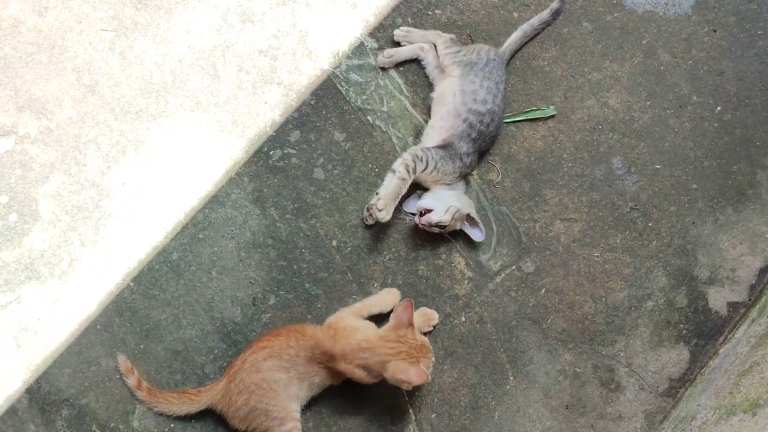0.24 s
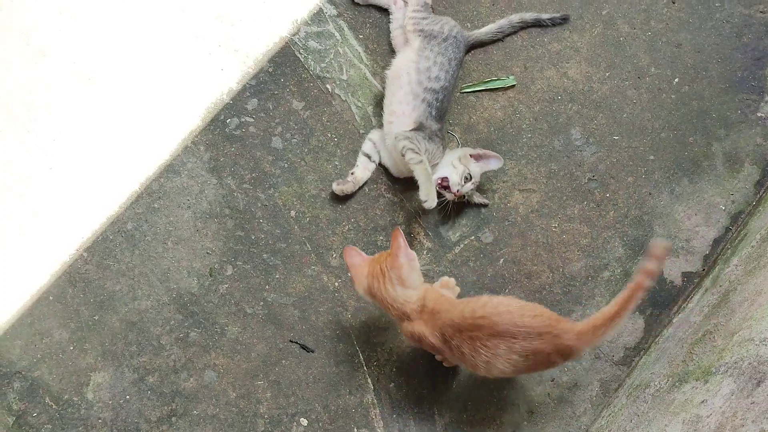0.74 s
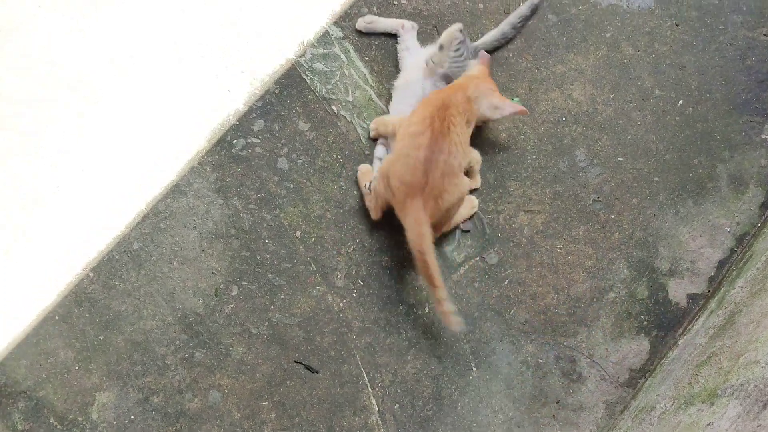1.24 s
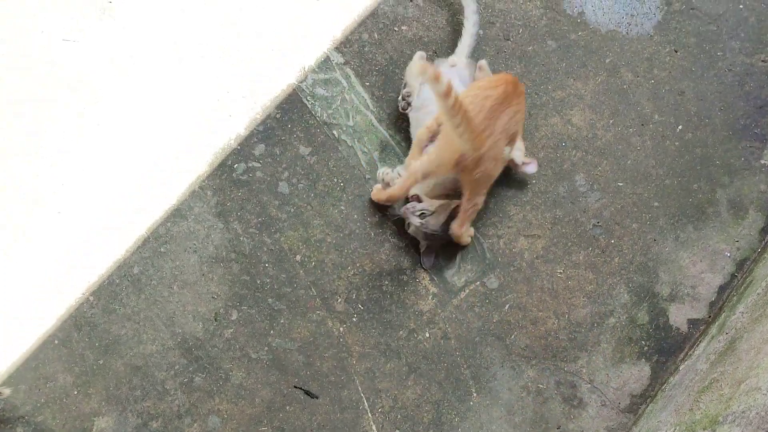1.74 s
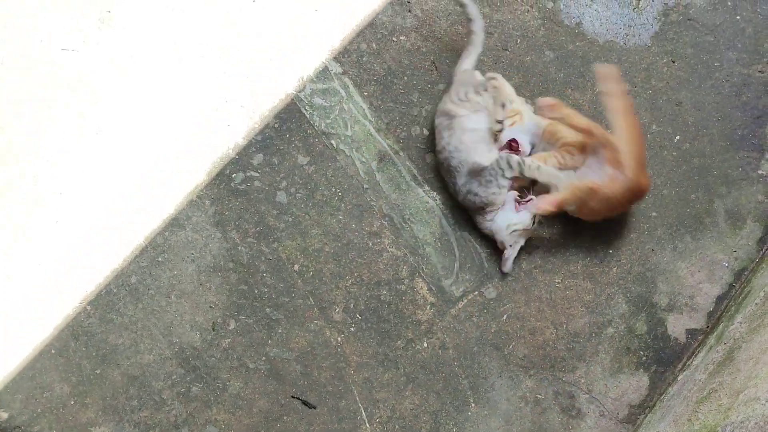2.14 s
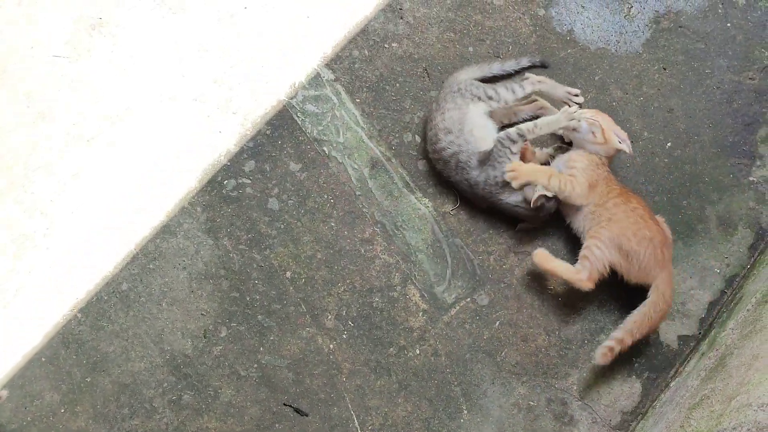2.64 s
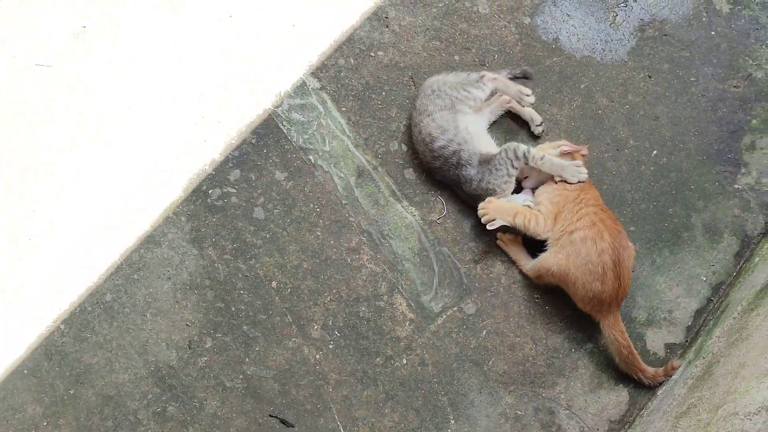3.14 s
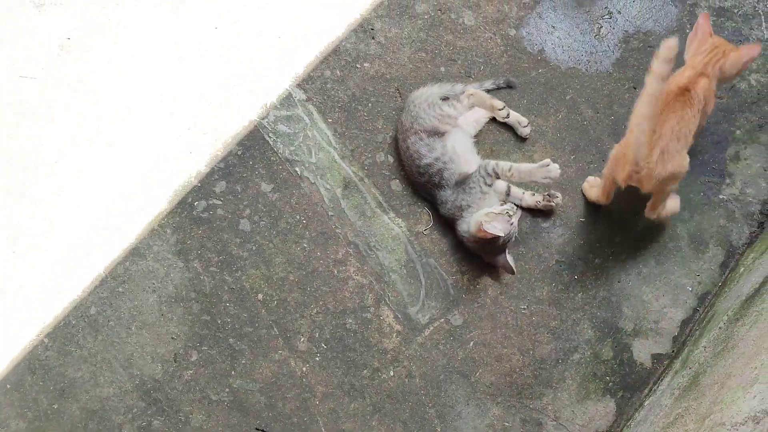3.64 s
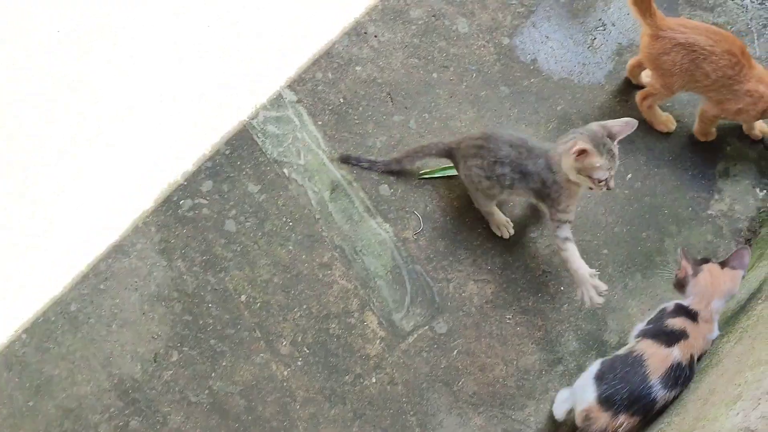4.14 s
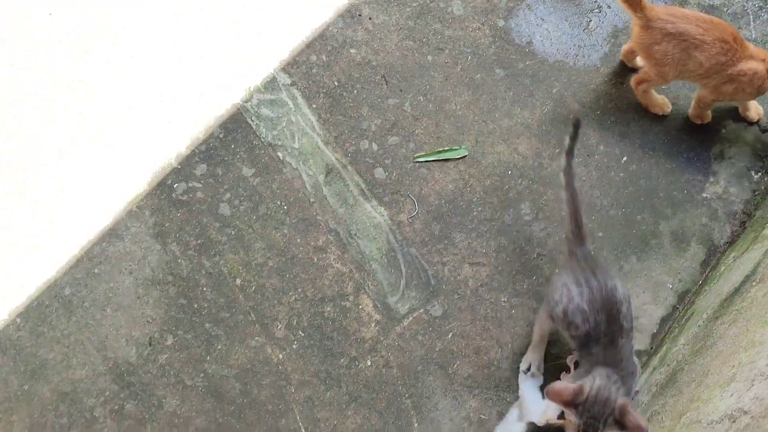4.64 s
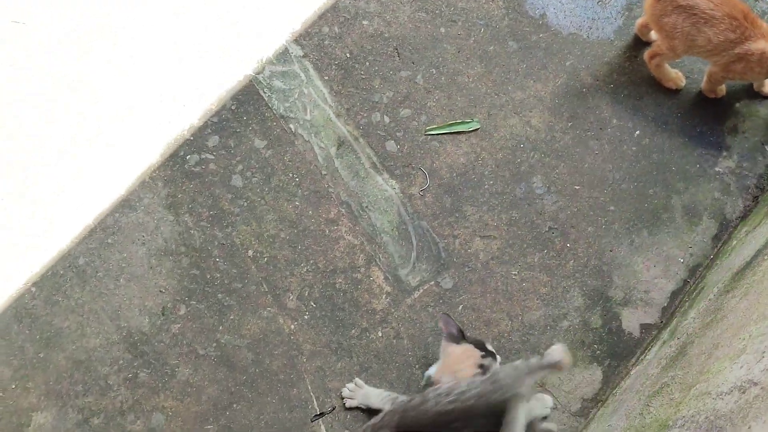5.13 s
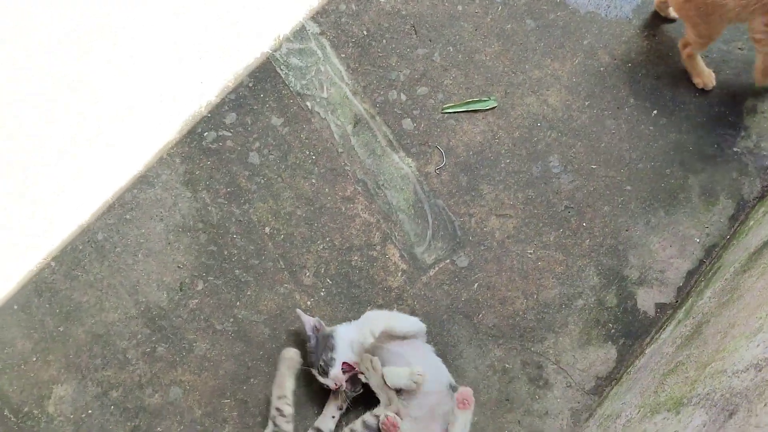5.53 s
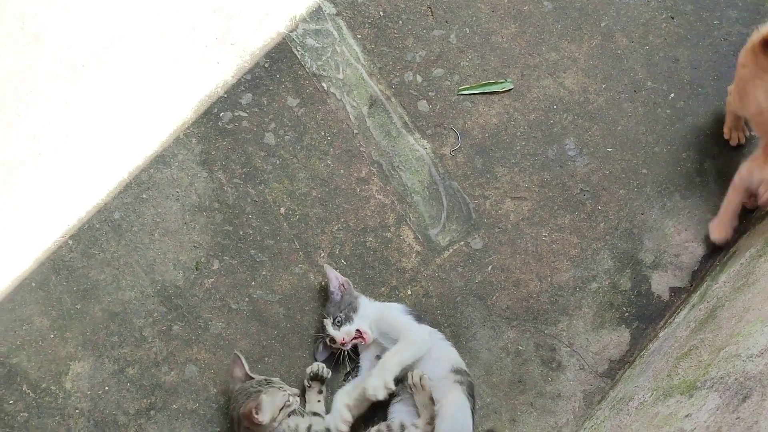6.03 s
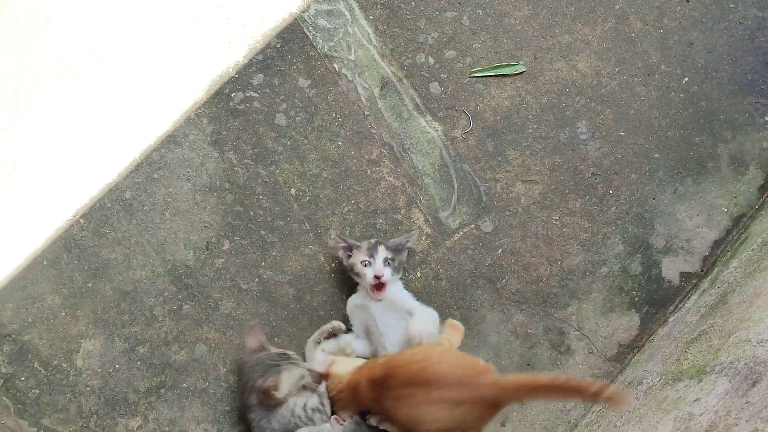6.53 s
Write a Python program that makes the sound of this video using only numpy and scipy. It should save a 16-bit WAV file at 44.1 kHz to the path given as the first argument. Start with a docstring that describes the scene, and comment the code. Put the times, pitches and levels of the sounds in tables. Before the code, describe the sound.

Outdoors in a concrete yard, small birds chip, whistle and trill at various distances, many blurred by short echoes. A close bird repeats rising slurred whistles early and midway. Light wind rumbles on a hand-held microphone with small bumps. Near the end the wind swells, a loud hard knock hits, sound cuts out for an instant, then the air returns slightly louder with a fly humming close. The playing kittens make no sound.

```python
"""A concrete yard: many small birds whistle, chirp and trill, straight and through its echoes.
Birds are near-sine whistles along pitch curves; the echoes are sparse random taps that die away.
Shaped noise makes the background and the light wind rumbling on a hand-held microphone.
A fly hums as wing-beat harmonics; finger knocks ring the housing and bumps push the membrane.
The sound drops out briefly near the end; the background returns a little louder, the fly close by."""
import sys
import numpy as np
from scipy import signal
from scipy.io import wavfile
from scipy.ndimage import uniform_filter1d

SR = 44100
rng = np.random.default_rng(int(sys.argv[2]) if len(sys.argv) > 2 else 0)


def waveform_to_disk(signal):
    """Save audio, clipped to [-1, 1], as 16-bit WAV at the path in sys.argv[1]."""
    frames = np.transpose(np.atleast_2d(signal))
    scaled = np.clip(frames, -1, 1) * 32767
    samples = np.round(scaled).astype(np.int16)
    wavfile.write(sys.argv[1], SR, samples)


N = 298998

# drop-out: fade_out_start_s, silent_from_s, silent_to_s, fade_in_end_s
DROPOUT_S = (6.293, 6.313, 6.374, 6.394)


def amp(db):
    """Amplitude factor of a level in dB."""
    return 10 ** (np.asarray(db) / 20)


def evened(x):
    """Scale to rms 1."""
    return x / np.sqrt(np.mean(x ** 2) + 1e-20)


def read(points, hz):
    """Interpolate a (hz, value) curve over log frequency."""
    f, value = np.transpose(points)
    return np.interp(np.log(hz + 1), np.log(f + 1), value)


def add(mix, start_s, sound, pan_db):
    """Mix in a mono sound; pan_db is left minus right."""
    part = mix[:, round(start_s * SR):][:, :len(sound)]
    gains = amp([[pan_db / 2], [-pan_db / 2]])
    part += sound[:part.shape[1]] * gains


def wander(count, smooth_s):
    """Smooth random curve of rms 1: white noise averaged twice."""
    width = max(round(smooth_s * SR), 1)
    once = uniform_filter1d(rng.standard_normal(count), width)
    return evened(uniform_filter1d(once, width))


def noise(spectrum, patchy_db, size):
    """Two partly alike channels of coloured noise with drifting patches, rms 1."""
    # left-right likeness: freq_hz, likeness_0_to_1
    likeness = [(30, 0.69), (600, 0.14), (3000, 0.39), (12000, 0.45)]
    hz = np.fft.rfftfreq(size, 1 / SR)
    frames = 4 * N // size + 5
    a, b, c, d, patches = rng.standard_normal((frames, len(hz), 5)).T
    patches = uniform_filter1d(patches, size=12, axis=0)
    patches = evened(uniform_filter1d(patches, size=10, axis=1))
    same = np.clip(read(likeness, hz), -1, 1)[:, None]
    left = a + 1j * b
    right = same * left + np.sqrt(1 - same ** 2) * (c + 1j * d)
    colour = amp(read(spectrum, hz)[:, None] + patchy_db * patches)
    z = np.array([left, right]) * colour
    return evened(signal.istft(z, nperseg=size, noverlap=3 * size // 4)[1][:, :N])


def air():
    """Distant town and leaves: steady shaped noise, a step louder after the drop-out."""
    # spectrum shape: freq_hz, relative_density_db (per Hz)
    air_shape = [(60, -9), (100, -2.5), (300, -6.5), (4600, -18.5), (8700, -27), (14100, -27), (15700, -34)]
    after = np.arange(N) / SR > DROPOUT_S[1]
    level_db = -46.5 + 2.9 * after
    return amp(level_db) * noise(air_shape, 1.2, size=1024)


def wind():
    """Wind on the microphone: lumpy low noise under a gust level curve."""
    # gust levels: time_s, level_db
    gust_levels = [(0, -41.5), (1.72, -36), (1.93, -37), (2.95, -40.5), (3.06, -33), (3.21, -39.5),
                   (4.9, -40.5), (5.36, -39.5), (5.631, -34), (6.04, -37), (6.1, -25.5), (6.3, -18),
                   (6.38, -33), (6.78, -42)]
    # spectrum shape: freq_hz, relative_density_db (per Hz)
    gust_shape = [(15, -8), (35, 0), (72, -8), (190, -30.5), (400, -67)]
    s, db = np.transpose(gust_levels)
    level_db = np.interp(np.arange(N) / SR, s, db) + [[1.5], [-1.5]]
    return noise(gust_shape, 2.8, size=4096) * amp(level_db)


def handling():
    """Taps ring the housing modes; bumps push the membrane in and let it swing back."""
    # taps: start_s, peak_level_db
    taps = [(6.084, -37), (6.1, -30), (6.222, -4.5), (6.288, -28.5)]
    # housing modes: freq_hz, relative_level_db, t60_s
    modes = [(970, 3, 0.012), (2020, 7, 0.0026), (3320, -11, 0.0049), (4700, -7, 0.0024)]
    # bumps: start_s, push_time_s, level_db
    bumps = [(1.729, 0.0086, -27), (1.747, 0.0022, -22.5), (2.627, 0.0046, -30), (6.273, 0.0024, -7)]
    out, t = np.zeros((2, N)), np.arange(3000) / SR
    ring = sum(amp(db - 60 * t / t60_s) * np.sin(2 * np.pi * hz * t) for hz, db, t60_s in modes)
    ring *= 1 - np.exp(-t / 0.0016)  # soft onset
    ring /= abs(ring).max()
    for start_s, db in taps:
        add(out, start_s, amp(db) * ring, pan_db=5.5)
    for start_s, push_s, db in bumps:
        u = t / push_s
        inward = u ** 2 * np.exp(2 - 2 * u)
        swing_back = 0.42 * (u / 2.9) ** 3 * np.exp(3 - 3 * u / 2.68)
        add(out, start_s, -amp(db) * (inward - swing_back), pan_db=5)
    return out


def fly():
    """One sharp pressure dip a wing beat; far off, the beat wavers and the second harmonic carries best."""
    # wing beat: time_s, beat_hz
    beat = [(0, 152), (3.6, 151.5), (6.3, 144.6), (6.39, 139.3), (6.435, 150.9), (6.59, 147.8),
            (6.63, 139.3), (6.676, 150.4), (6.72, 128.3), (6.748, 148), (6.78, 152)]
    # harmonics 1, 2, ..: relative_level_db
    wing_db = [-5.5, -7, -7, -25, -14, -14.5, -9.5, -18, -30, -32, -22]
    far_db, fade_db_per_s, near_db = -58, 0.8, -40.5
    t = np.arange(N) / SR
    far = t < DROPOUT_S[1]
    beat_hz = np.interp(t, *np.transpose(beat)) * (1 + 0.016 * far * wander(N, 0.03206))
    turns = np.cumsum(beat_hz) / SR
    wings = np.zeros(N)
    for k, db in enumerate(wing_db):
        colour_db = db + 6 * far * (k == 1) + 2.2 * wander(N, 0.025)
        wings -= amp(colour_db) * np.cos(2 * np.pi * (k + 1) * turns)
    level_db = np.where(far, far_db - fade_db_per_s * t, near_db)
    return np.sqrt(2) * amp(level_db) * wings * amp([[-2.5], [1.5]])


def yard(x):
    """Sparse echoes of random sign, building up quickly and dying band by band."""
    # echo decay: freq_hz, t60_s
    decay = [(4000, 0.75), (8000, 0.49)]
    build_s = 0.02
    taps = np.zeros((3, SR))
    at = np.arange(100, SR - 20, 20) + rng.integers(0, 20, (3, (SR - 101) // 20))
    np.put_along_axis(taps, at, rng.choice([-1., 1.], at.shape), 1)
    taps = taps[:2] + 1.44 * taps[2]  # the ports are close and share most echoes
    hz, t, z = signal.stft(taps, SR, nperseg=256)
    build = np.minimum(t / build_s, 1)
    fall = amp(-60 * t / read(decay, hz)[:, None])
    tail = signal.istft(z * build * fall, SR, nperseg=256)[1]
    return signal.fftconvolve(x, tail / np.linalg.norm(tail[0]), axes=1)[:, :N]


def bend(length_s, first_hz, middle_hz, last_hz):
    """Pitch along a parabola through three points."""
    u = np.linspace(0, 1, round(length_s * SR))
    first = first_hz * (1 - u) * (1 - 2 * u)
    middle = 4 * middle_hz * u * (1 - u)
    return first + middle + last_hz * u * (2 * u - 1)


def whistle(hz, db, soft):
    """A near sine with soft ends, unsteady pitch and level; a falling note weakens as it sinks."""
    sag_db_per_octave = 4.5
    n = len(hz)
    sag_db = sag_db_per_octave * np.minimum(np.log2(hz / hz[0]), 0)
    db = db + sag_db + 1.2 * wander(n + 999, 0.006)[:n]
    hz = hz * (1 + 0.0034 * wander(n + 999, 0.0034)[:n])
    tone = np.sin(2 * np.pi * np.cumsum(hz) / SR)
    return np.sqrt(2) * amp(db) * signal.windows.tukey(n, soft) * tone


def note(length_s, first_hz, middle_hz, last_hz, db, swell_db=0):
    """One slurred whistle, maybe rising swell_db to full level over its first half."""
    hz = bend(length_s, first_hz, middle_hz, last_hz)
    u = np.linspace(0, 1, len(hz))
    swell = np.minimum(u / 0.5, 1) ** 3 - 1
    return whistle(hz, db + swell_db * swell, soft=0.25)


def thin_whistle():
    """A high sine with shaky pitch and 70 Hz level pulses."""
    # line: time_s, pitch_hz, level_db
    line = [(1.281, 7190, -52), (1.499, 7530, -49.5), (2.0, 7580, -45), (2.24, 7530, -67)]
    out, (s, hz, db) = np.zeros((2, N)), np.transpose(line)
    t = np.arange(s[0], s[-1], 1 / SR)
    pitch_hz = np.interp(t, s, hz) + 70 * wander(len(t), 0.0014)
    pulses = (1 + 0.5 * np.sin(2 * np.pi * 70 * t)) * amp(np.interp(t, s, db))
    add(out, s[0], pulses * np.sin(2 * np.pi * np.cumsum(pitch_hz) / SR), pan_db=-4)
    return out


def chip(start_s, hz, db, perch):
    """A short falling note as a score row."""
    return start_s, 0.0187, hz, 0.885 * hz, 0.852 * hz, db, perch


def twitter(count=30):
    """Score rows for the chips of a small flock that soon falls silent."""
    when, pitch, size = rng.random((count, 3)).T
    start_s = (np.arange(count) + when) * 0.036
    pitch_hz = 2350 * 1.65 ** pitch
    level_db = -58 + 7 * size
    return [chip(s, hz, db, "right") for s, hz, db in zip(start_s, pitch_hz, level_db)]


def trills():
    """Spells trills out as single notes, each a little off in time, pitch and level."""
    # trills: start_s, spacing_s, repeats, perch
    runs = [(.033, .124, 5, "right"), (6.628, .0257, 6, "right"), (2.262, .0275, 25, "wall"),
            (3.530, .080, 10, "roof")]
    # the note each trill repeats: length_s, first_hz, middle_hz, last_hz, level_db
    run_notes = [(0.041, 2100, 3100, 2500, -51.5), (0.0048, 6700, 5800, 4500, -36),
                 (0.0146, 4240, 5220, 5140, -46.5), (.043, 5840, 4410, 2900, -32)]
    rows = []
    for (start_s, spacing_s, repeats, perch), shape in zip(runs, run_notes):
        rows += [(start_s + k * spacing_s, *shape, perch) for k in range(repeats)]
    # time in s, share of the pitch, level in dB
    off = rng.standard_normal((len(rows), 3)) * [0.0015, 0.02, 1.2]
    return [(s + ds, n, a, b * (1 + share / 2), c * (1 + share), db + step_db, perch)
            for (s, n, a, b, c, db, perch), (ds, share, step_db) in zip(rows, off)]


def dropping(hold_s, kind, db):
    """A held pitch, at first a little sharp, that runs into a drop in one breath."""
    # by kind: hold_hz, hold_gain_db, drop_s, middle_hz, last_hz, perch
    shapes = {"long": (5900, -8.5, 0.018, 4850, 4100, "wall"),
              "short": (5700, -9.5, .013, 4780, 4030, "wall"),
              "pipe": (5060, 3.4, 0.031, 4550, 3840, "open"),
              "low": (2665, 0.67, 0.061, 2580, 2500, "right")}
    overshoot_share, overshoot_s = 0.031, 0.0097
    hold_hz, hold_gain_db, drop_s, middle_hz, last_hz, perch = shapes[kind]
    t = np.arange(0, hold_s + drop_s, 1 / SR)
    held_hz = hold_hz * (1 + overshoot_share * np.exp(-t[t < hold_s] / overshoot_s))
    pitch_hz = np.r_[held_hz, bend(drop_s, hold_hz, middle_hz, last_hz)]
    turn_s = [hold_s - 0.003, hold_s + 0.0027]
    level_db = db + np.interp(np.arange(len(pitch_hz)) / SR, turn_s, [hold_gain_db, 0])
    return whistle(pitch_hz, level_db, soft=0.27), perch


def score():
    """Rows of start_s, length_s, first_hz, middle_hz, last_hz, level_db before perch gain, perch."""
    # close bird, climbing quickly then slower: start_s, length_s, first_hz, top_hz, level_db
    rising = [(0.984, .115, 2770, 3667, -28), (1.3, 0.15, 2716, 3834, -27), (1.649, 0.17, 2645, 4054, -28),
              (3.584, 0.12, 2540, 3720, -31), (3.864, 0.15, 2514, 3773, -28),
              (4.208, 0.15, 2583, 4000, -29)]
    # sharp downstrokes from behind the wall: start_s, length_s, kind, level_db
    strokes = [(2.944, 0.14, "high", -42), (3.074, 0.035, "wide", -34.5), (4.345, 0.051, "high", -36.5),
               (6.332, .04, "wide", -32), (6.406, 0.033, "high", -32)]
    # by kind: first_hz, middle_hz, last_hz
    stroke_hz = {"wide": (6080, 4344, 3100), "high": (8400, 7200, 6500)}
    # level whistles: start_s, length_s, pitch_hz, level_db, perch
    held = [(0.423, 0.033, 3594, -55, "wall"), (.962, 0.013, 5640, -43, "hedge"),
            (2.02, 0.012, 2660, -49.5, "right"), (2.173, 0.079, 5946, -36, "right"),
            (3.272, 0.13, 6950, -40.5, "wall"), (4.322, 0.055, 2218, -44.5, "right"),
            (4.523, 0.039, 5020, -31, "right"), (4.94, 0.11, 2774, -51, "hedge"),
            (5.045, 0.22, 2980, -53, "hedge"), (5.453, 0.033, 4440, -57.5, "hedge"),
            (5.67, 0.11, 2552, -30.5, "open"), (5.813, 0.083, 2573, -40, "open"),
            (6.088, 0.019, 2015, -35.5, "open"), (6.115, 0.094, 2175, -42, "right"),
            (6.442, 0.033, 7460, -36.5, "wall")]
    # slurred whistles: start_s, length_s, first_hz, middle_hz, last_hz, level_db, perch
    slurs = [(0.667, 0.075, 5060, 4900, 4500, -49, "wall"), (1.012, 0.12, 7490, 7010, 7200, -49.5, "wall"),
             (1.253, 0.056, 5210, 5450, 5600, -46.5, "hedge"),
             (1.605, 0.057, 4900, 5400, 5700, -42.5, "right"),
             (1.689, 0.068, 2230, 2020, 1860, -54, "hedge"), (2.05, 0.051, 6370, 4410, 3390, -34.5, "wall"),
             (2.512, 0.069, 6030, 6350, 6500, -58, "hedge"),
             (2.636, 0.038, 3100, 3650, 4040, -54.5, "hedge"),
             (3.156, 0.047, 3190, 3150, 2970, -46.5, "right"),
             (3.232, 0.062, 5910, 6600, 6980, -37.5, "wall"), (3.409, 0.14, 4234, 4134, 4075, -36, "open"),
             (4.428, 0.075, 1764, 1962, 2180, -40, "right"),
             (4.494, 0.23, 2140, 1980, 1723, -43.5, "right"),
             (4.628, 0.17, 2896, 2543, 2314, -39.5, "right"),
             (4.913, 0.049, 2410, 2570, 2640, -43, "right"), (5.306, 0.079, 3574, 3330, 3220, -49, "hedge"),
             (5.307, 0.041, 1620, 1910, 1890, -45, "right"), (5.333, 0.082, 1495, 1510, 1595, -44, "open"),
             (5.557, 0.13, 2422, 2500, 2566, -37, "open"), (6.204, 0.047, 3104, 3230, 3580, -46, "hedge"),
             (6.249, 0.024, 3860, 6480, 3900, -46.5, "open")]
    # falling chips: start_s, first_hz, level_db
    chips = [(.112, 4550, -44), (.205, 3290, -50), (0.259, 3500, -46), (0.336, 4390, -42.5),
             (.5, 2740, -50), (.856, 3440, -43), (5.916, 3170, -41), (5.945, 2740, -37.5),
             (5.983, 2540, -34.5), (6.02, 2370, -36), (6.055, 2295, -30)]
    climb_halfway = 0.53  # share of the climb done at half length
    rows = [(s, n, low, low + climb_halfway * (top - low), top, db, "close")
            for s, n, low, top, db in rising]
    rows += [(s, n, *stroke_hz[kind], db, "wall") for s, n, kind, db in strokes]
    rows += [(s, n, hz, hz, hz, db, perch) for s, n, hz, db, perch in held]
    rows += slurs
    rows += [chip(*row, "right") for row in chips]
    return rows + trills() + twitter()


def birds():
    """Sings the notes from their perches, straight and through the yard."""
    # by perch: left_minus_right_db, direct_db, echo_db; the farther, the more arrives as echo
    perches = {"close": (4.7, 0, -3), "right": (-2.5, 0, -1.8), "wall": (-1.8, -3, 4.1),
               "hedge": (7.9, -0.44, 4.9), "roof": (-1.4, -2, 1.96), "open": (-2.7, 0, -2.5)}
    # calls that hold a pitch, then drop: start_s, hold_s, kind, level_db
    drops = [(0.872, 0.034, "long", -37), (1.171, 0.039, "long", -36.5), (1.405, 0.013, "short", -39.5),
             (1.567, 0.014, "short", -38.5), (1.727, 0.016, "short", -38), (1.887, 0.01, "short", -37),
             (4.458, 0.055, "pipe", -32.5), (4.953, 0.13, "low", -40.5), (6.516, 0.048, "pipe", -25.5)]
    sung = {name: np.zeros((2, N)) for name in perches}
    for start_s, *shape, perch in score():
        swell_db = 22 * (perch == "close")  # the climbing whistles start faint
        add(sung[perch], start_s, note(*shape, swell_db), perches[perch][0])
    for start_s, *call in drops:
        sound, perch = dropping(*call)
        add(sung[perch], start_s, sound, perches[perch][0])
    sung["right"] += thin_whistle()
    direct = sum(amp(perches[name][1]) * x for name, x in sung.items())
    echo = sum(amp(perches[name][2]) * x for name, x in sung.items())
    return direct + yard(echo)


def scene():
    """Sum of all layers."""
    return air() + wind() + handling() + fly() + birds()


def record(dry):
    """The drop-out, then a low-pass band limit."""
    edge_hz = 15650
    out = dry * np.interp(np.arange(N) / SR, DROPOUT_S, [1, 0, 0, 1])
    low_pass = signal.firwin(511, edge_hz, window=("kaiser", 9), fs=SR)
    return signal.oaconvolve(out, low_pass[None], "same")


dry = scene()
out = record(dry)
waveform_to_disk(out)
```